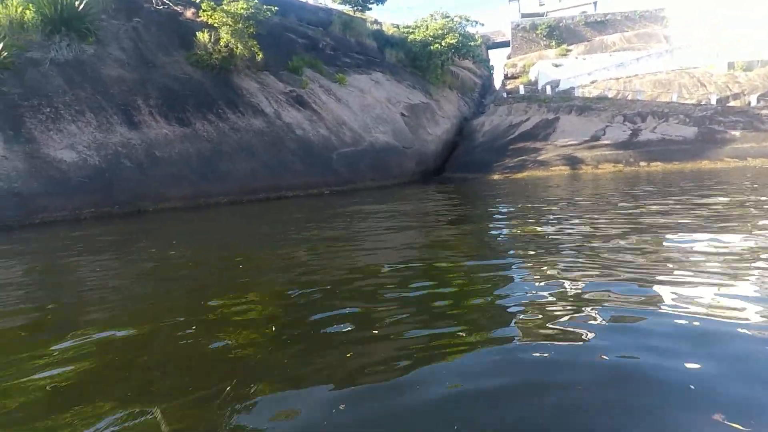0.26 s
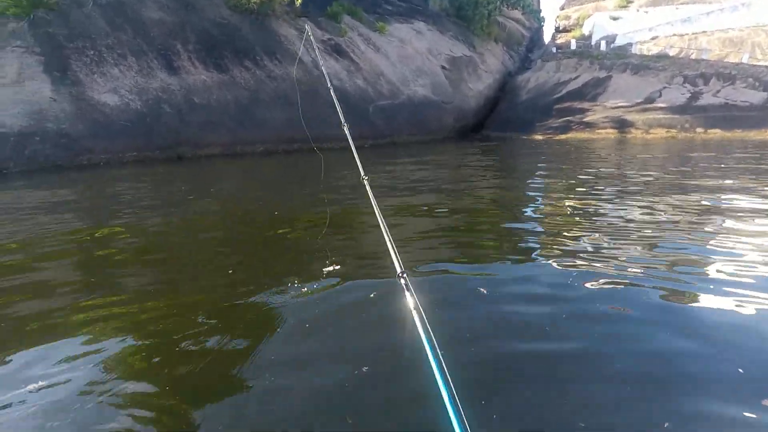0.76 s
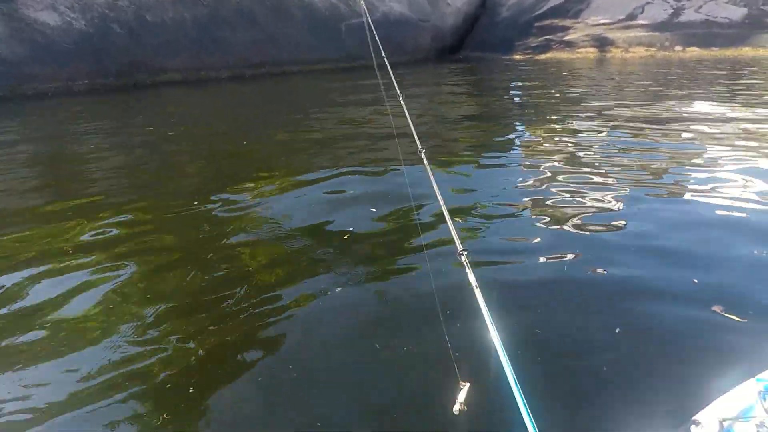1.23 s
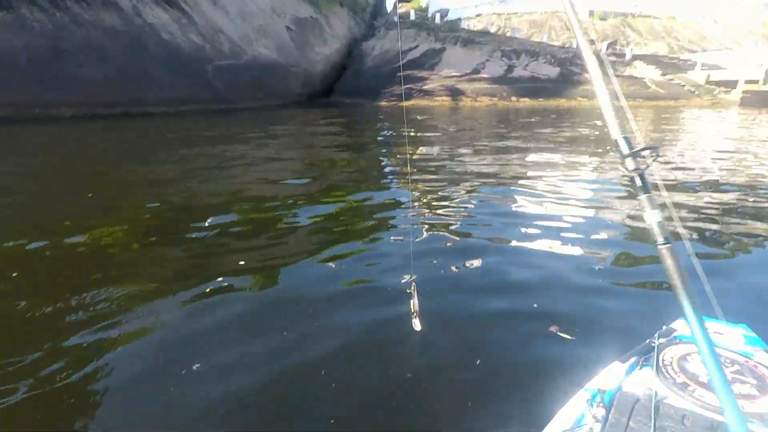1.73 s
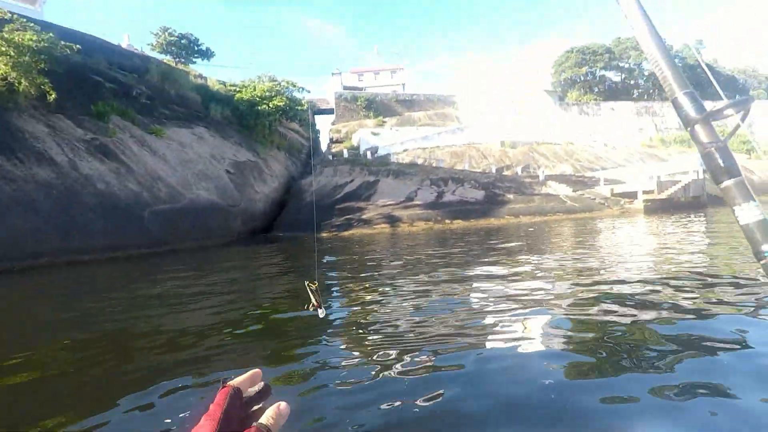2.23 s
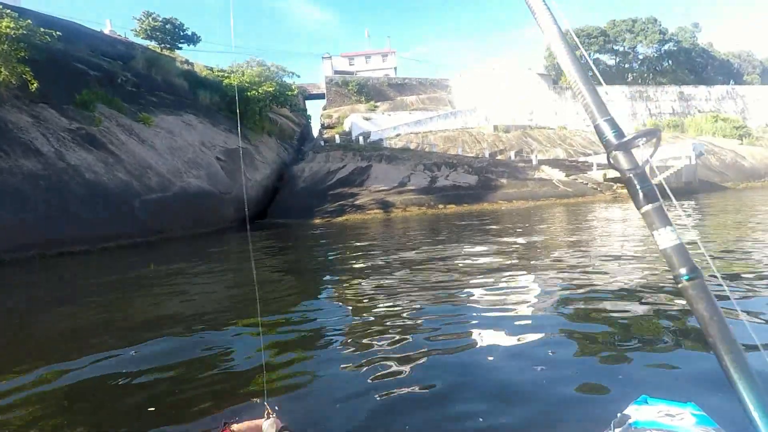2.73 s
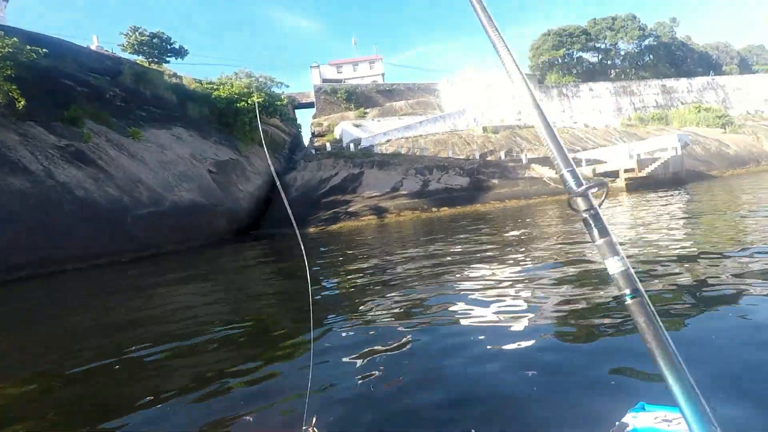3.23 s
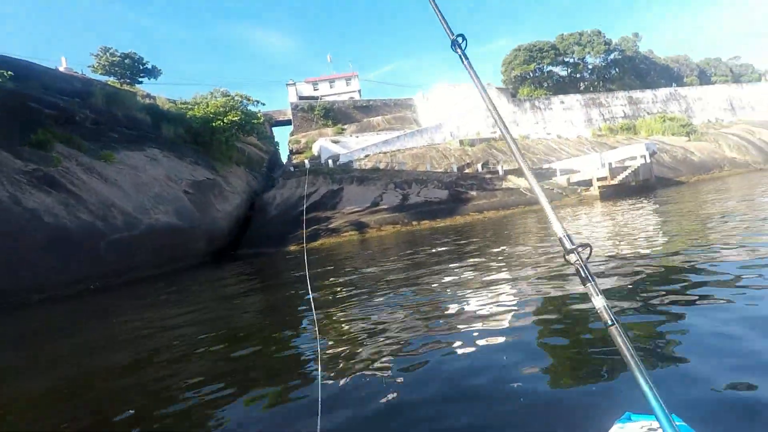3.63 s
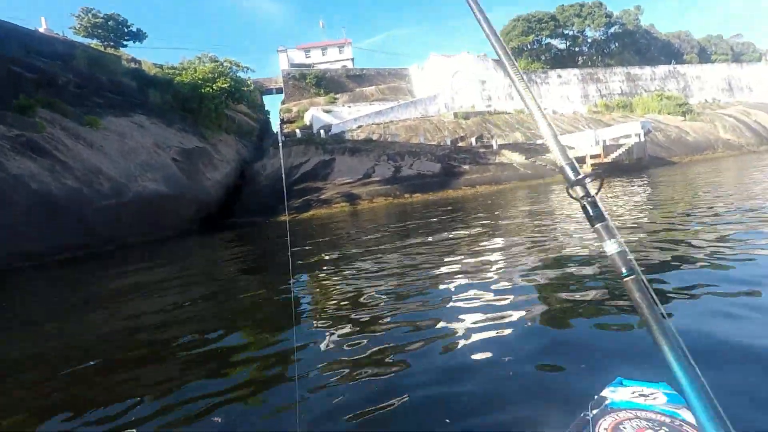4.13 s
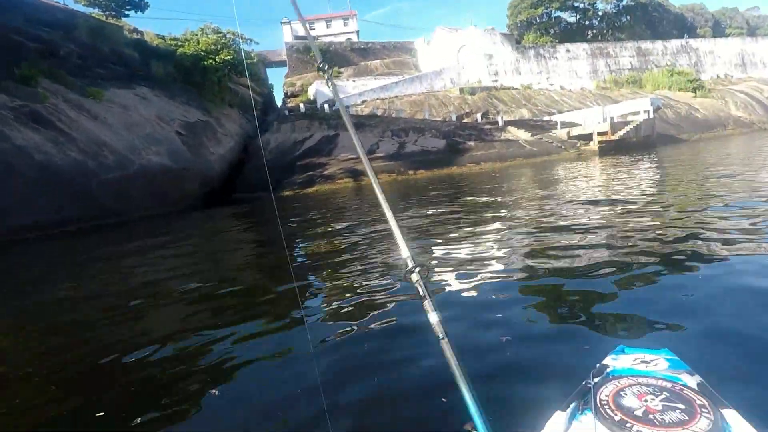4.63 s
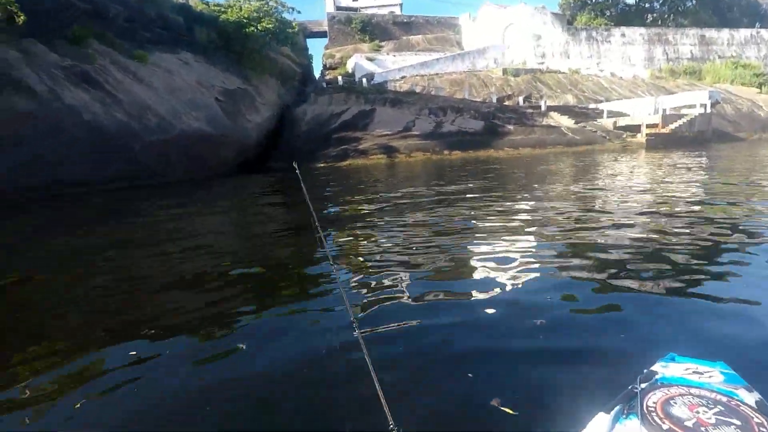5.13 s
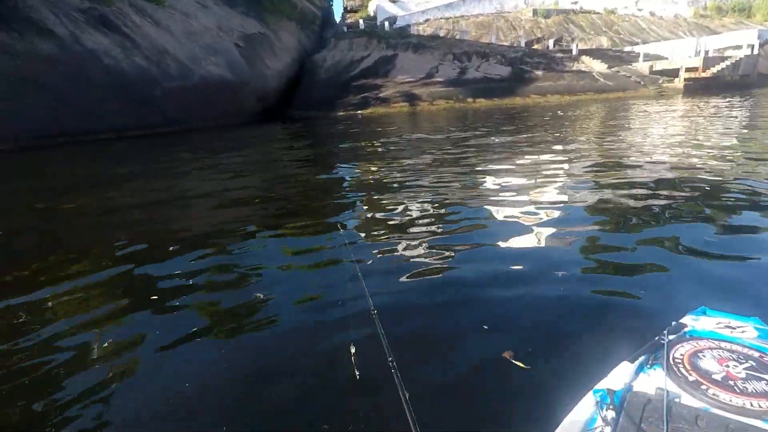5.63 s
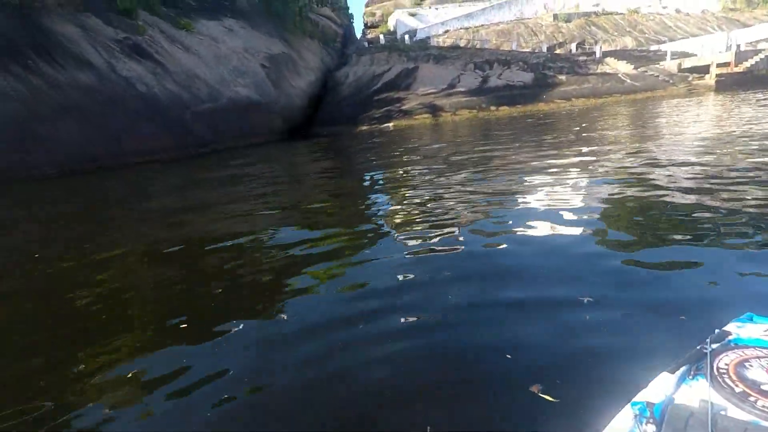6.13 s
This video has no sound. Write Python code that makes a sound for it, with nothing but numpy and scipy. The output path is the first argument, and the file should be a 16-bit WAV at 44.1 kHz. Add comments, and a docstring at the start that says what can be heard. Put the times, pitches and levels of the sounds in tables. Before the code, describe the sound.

A low, beating hum and noisy rumble runs unbroken, boxed in by a closed camera housing, with soft water wash and a very thin pulsing whine on the left. Small ripples plop at 0.4, 1.3 and 1.8 seconds; dry line rustle and ticks sit on the right, with a snag near 1.05. At 2.0 to 2.2 gear scrapes, clacks and drops with a hollow double thud. Around 2.5 the reel clicks rapidly and drags, then a hard knock at 2.67. Line crackles at 3.2 to 3.35, followed by hull bumps at 3.36 and 3.41. The reel snaps sharply at 3.9, and the loudest plastic knock follows at 4.0. A line slide rustles at 4.3, with faint tones at 4.1 and 4.8. From 5.0 drops ping brightly at 5.13, rustling grows, and hollow slaps of water come at 5.0, 5.2, 5.6 and 6.1.

```python
"""Kayak and fishing gear heard through a closed housing

Beating low tones and filtered-noise rumble fill the housing; filtered noise washes along hull and shore.
Ripples slap the plastic and trap ringing air. Gear blows excite mount and hull modes; the reel clicks,
snaps and drags. Line and cloth rustle in noise grains and snag, and drops ping, all mostly on the right.
A thin pulsing whine sits on the left, and two faint tones glide by."""
import sys
import numpy as np
from scipy import signal
from scipy.fft import rfft, irfft, next_fast_len
from scipy.io import wavfile
from scipy.ndimage import uniform_filter1d, minimum_filter1d, map_coordinates

SR = 44100
rng = np.random.default_rng(int(sys.argv[2]) if len(sys.argv) > 2 else 0)


def master_out(mix):
    """Clip the mix to full scale and print it as 16-bit PCM to the path in sys.argv[1]."""
    frames = np.transpose(np.atleast_2d(mix))
    ceiling = np.clip(frames, -1, 1)
    pcm = np.round(ceiling * 32767).astype(np.int16)
    wavfile.write(sys.argv[1], SR, pcm)


N = 280917
T = np.arange(N) / SR  # [s]

# Levels are relative inside each layer; left-right values are positive toward the left.
# low hum tones: (frequency [Hz], level [dB])
HUM_TONES = [(42, -25.5), (48, -20), (72, -37), (78, -25.5), (90, -18.5), (100.9, -33.5), (114.1, -23.5),
             (120, -28.5), (183.9, -49), (216.1, -44), (250.5, -43.5)]
# rumble spectrum shape: (frequency [Hz], density [dB per Hz])
RUMBLE_SPECTRUM = [(8, -51), (16, -9.5), (24, -0.5), (50, 6.5), (75, 4.5), (115, -2), (135, -1),
                   (160, -9.5), (186, -8.5), (235, -17.5), (290, -24.5), (400, -41), (600, -63),
                   (1500, -110)]
# balance of hum and rumble: (frequency [Hz], left-right [dB])
DRONE_LEAN = [(30, 0.1), (70, 1.4), (140, 1.5), (250, 6), (350, 18.5), (700, 39.5)]
# wash spectrum shape: (frequency [Hz], density [dB per Hz])
WASH_SPECTRUM = [(150, -45), (330, 0.5), (480, 1.5), (820, -0.5), (1050, -4.5), (1500, -8.5), (2200, -13.5),
                 (3500, -19), (5000, -23), (9000, -23.5), (11000, -29), (14500, -41)]
# wash along the hull: (time [s], level [dB])
WASH_LEVELS = [(0.0, -47.5), (0.499, -49.5), (1.6, -52.5), (2.02, -48.5), (2.25, -51), (2.9, -50.5),
               (6.37, -48.5)]
# correlation of the wash between ports, before their phase turn: (frequency [Hz], likeness [-1..1])
PORT_LIKENESS = [(300, 0.75), (1000, 0.64), (1600, 0.16), (4000, 0.81), (5500, .1)]
# flexing housing walls drive the ports against each other: (frequency [Hz], left lead [rad])
PORT_PHASE = [(150, 0), (280, 0), (380, 2.45), (1150, 2.65), (1750, 1.4), (2450, 2.1), (3500, .4),
              (4500, .2), (5100, -1.8)]
# rubbing line and cloth spectrum shape: (frequency [Hz], density [dB per Hz])
RUSTLE_SPECTRUM = [(1000, -58.5), (3000, -12.5), (4800, -10), (6000, -2.5), (7700, -0.5), (8700, -10.5),
                   (10000, -14), (12500, -36.5), (14500, -49)]
# tick spectrum: (frequency [Hz], density [dB per Hz])
SNAP_SPECTRUM = [(1000, -38), (3000, -12.5), (4800, -5.5), (7700, 7.5), (9800, -9.5), (12500, -17),
                 (13600, -25.5), (15000, -44)]
# rubbing line and cloth: (time [s], level [dB])
RUB_LEVELS = [(0.0, -56), (1.03, -55.5), (1.24, -57), (1.58, -60), (2.55, -59), (2.68, -55), (3.03, -55),
              (3.21, -53), (3.8, -56.5), (4.36, -57), (4.54, -63), (5.13, -59.5), (5.4, -54), (5.63, -52),
              (5.87, -56), (6.37, -53)]
# line running through the fingers: (start [s], length [s], change of rubbing level [dB])
LINE_SLIDES = [(1.074, 0.059, 6), (3.202, 0.083, 6), (4.323, 0.26, 4), (5.12, 0.088, 10.5),
               (5.205, .07, -4), (5.985, 0.056, 11)]
# line snagging and snapping free: (time [s], level [dB])
LINE_SNAGS = [(0.175, -26.5), (0.9325, -33), (1.0547, -24), (1.103, -28), (2.7526, -32.5), (3.2199, -21.5),
              (3.267, -24.5), (3.2952, -21), (3.3088, -23), (3.3583, -24.5), (4.289, -38), (4.3796, -22.5),
              (4.3857, -28), (5.1312, -33), (5.232, -25), (5.265, -34), (5.957, -23.5)]
# drops from the wet line pinging on the gear: (time [s], level [dB], pitch [Hz])
DROP_PINGS = [(0.177, -31, 7500), (0.932, -31, 7760), (1.006, -33.5, 5990), (2.706, -31, 7500),
              (2.919, -26.5, 7760), (3.219, -34.5, 11900), (4.067, -34, 8050), (4.251, -35, 8000),
              (4.289, -37, 5360), (5.124, -30, 6900), (5.131, -21.5, 7700), (5.215, -34, 8000),
              (5.221, -27, 5900), (5.2225, -29, 7700), (5.2323, -35.5, 4000), (5.264, -31, 7100),
              (5.936, -30.5, 7300), (6.142, -38.5, 3070), (6.152, -42, 12000)]
# larger ripples slapping the hull: (time [s], slap [dB], air pocket [dB], cavity pitch [Hz])
HULL_LAPS = [(0.447, -23, -27, 760), (1.335, -32, -19, 340), (1.782, -23, -26, 755), (4.989, -32, -21, 620),
             (5.212, -19, -21, 680), (5.549, -22, -27, 920), (5.624, -25, -26, 750), (6.123, -17, -21, 740)]
# wetted plastic modes: (frequency [Hz], width [Hz], level [dB])
SLAP_MODES = [(540, 150, -5), (800, 200, 0), (1030, 160, -3), (1700, 500, -19)]
# gear dragging against the reel: (start [s], length [s], level [dB])
REEL_DRAGS = [(2.015, .09, -31.5), (2.492, .045, -27.5), (2.51, .15, -32), (3.708, .035, -29),
              (3.885, .1, -38)]
# reel ratchet clicks: (time [s], level [dB], low-pass corner [Hz])
RATCHET_CLICKS = [(2.0415, -22.5, 3000), (2.068, -23, 3000), (2.507, -9.5, 12000), (2.5296, -19.5, 9000),
                  (2.5501, -19, 9100), (2.577, -18, 4500), (2.606, -22, 3500), (2.625, -24, 3500),
                  (2.637, -26.5, 4000), (3.4139, -15.5, 7000), (3.717, -23.5, 2500), (3.8933, -13.5, 6000),
                  (3.941, -23.5, 3000), (3.953, -26, 3000)]
# bail arm snapping over, one row: (time [s], level [dB], low-pass corner [Hz])
BAIL_SNAP = (3.896, -2, 3600)
# reel body modes: (frequency [Hz], width [Hz], level [dB])
REEL_MODES = [(768, 36, 9), (870, 55, 2), (1170, 80, -3), (2410, 85, 2), (2800, 110, -14), (3260, 110, -12),
              (3850, 70, -12), (4280, 120, -6), (4570, 100, -13), (5030, 140, -4), (5650, 200, -16),
              (6570, 130, -13), (7750, 200, -4), (8470, 110, -1), (12300, 600, -23)]
# balance of clicks and bail snap: (frequency [Hz], left-right [dB])
CLICK_LEAN = [(2400, -1), (4500, -3.5), (7500, -9)]
# gear clacking against the camera mount: (time [s], level [dB], low-pass corner [Hz])
MOUNT_KNOCKS = [(2.0432, -6.5, 1250), (2.0688, -10, 1200), (2.6674, -0.5, 2800), (3.408, -23, 4000),
                (4.0041, 1.5, 3400)]
# camera mount modes: (frequency [Hz], width [Hz], level [dB])
MOUNT_MODES = [(500, 130, -9), (820, 160, 0), (1070, 170, -6), (1420, 230, -12), (1780, 340, -19),
               (2420, 200, -9), (2850, 280, -15), (3300, 250, -19), (4250, 300, -26), (7750, 500, -25)]
# gear dropping on the hull and bouncing: (time [s], level [dB], low-pass corner [Hz])
HULL_THUDS = [(2.1338, -2.5, 720), (2.148, -1.5, 1900), (2.1578, -9, 900), (2.165, -15, 700),
              (2.669, -11, 400), (3.3646, 0, 520), (3.4122, -4, 1250), (3.421, -10, 620), (3.432, -8, 480),
              (3.441, -20, 1100)]
# hollow hull modes: (frequency [Hz], width [Hz], level [dB])
HULL_MODES = [(215, 55, -1), (307, 65, 4.5), (410, 75, 3.5), (505, 65, 8.5), (590, 70, -3), (830, 100, -4),
              (990, 100, -3), (1190, 140, -12), (1680, 260, -15)]
# balance of the thuds: (frequency [Hz], left-right [dB])
THUD_LEAN = [(300, 10), (420, 7), (520, 1), (1500, 0)]
# phase between ports as a thud rocks the housing: (frequency [Hz], left lead [rad])
ROCKING_PHASE = [(150, -.8), (330, -2.3), (600, -2.55), (750, -3.7), (1100, -3.9), (1400, -6)]
# faint gliding tones: (start [s], length [s], from [Hz], to [Hz], level [dB])
TONE_GLIDES = [(4.07, .21, 605, 595, -53), (4.76, .17, 710, 800, -51)]

WASH_SWING_DB = 0.9
SLIP_GAP_S, SLIP_LOSS_DB = 0.0079, 13  # typical gap and loss between slips after a snag
DROP_T60_S, DROP_ATTACK_S = 0.012, 0.00063
DROP_CRACK_DB, DROP_LEAN_DB = -11.5, -14
RIPPLE_DB, RIPPLE_HZ, RIPPLE_LOG_SPREAD = -37, 720, 0.16  # small ripples, centre values and pitch scatter
POCKET_CYCLES = 11.5  # cycles at the cavity pitch for a 60 dB decay
TOP_HZ = 15200


def amp(db):
    """Decibels to gain."""
    return 10 ** (np.asarray(db) / 20)


def unit(x):
    """Scale to rms 1."""
    return x / np.sqrt(np.mean(x ** 2) + 1e-20)


def along(points, hz):
    """Interpolate (frequency [Hz], value) points on a log axis."""
    f, v = np.transpose(points)
    return np.interp(np.log(hz + 1), np.log(f + 1), v)


def wobble(knots_hz):
    """Smooth random curve."""
    knots = rng.standard_normal(int(N * knots_hz / SR) + 4)
    return map_coordinates(knots, [T * knots_hz])


def swell(start_s, length_s):
    """Half-sine rise and fall, zero outside."""
    return np.sin(np.pi * np.clip((T - start_s) / length_s, 0, 1))


def filtered(x, response):
    """Apply a complex response of frequency [Hz]."""
    size = next_fast_len(N + SR // 2)
    return irfft(rfft(x, size) * response(np.fft.rfftfreq(size, 1 / SR)), size)[..., :N]


def coloured(x, spectrum):
    """Shape x by a (frequency [Hz], level [dB]) spectrum."""
    return filtered(x, lambda hz: amp(along(spectrum, hz)))


def softened(x, corner_hz, order):
    """Low-pass: soft contact carries little treble."""
    sos = signal.butter(order, min(corner_hz, SR / 2 - 1), fs=SR, output="sos")
    return signal.sosfilt(sos, x)


def resonate(x, modes, sign=-1):
    """Parallel modes, alternately opposed (-1) or in step (+1); a unit impulse rings with peak 1."""
    def body(hz):
        total = 0
        for k, (centre_hz, width_hz, db) in enumerate(modes):
            damping = 1j * hz * width_hz
            total = total + sign ** k * amp(db) * damping / (centre_hz ** 2 - hz ** 2 + damping)
        return total

    impulse_ring = irfft(body(np.fft.rfftfreq(SR, 1 / SR)))
    return filtered(x, body) / np.abs(impulse_ring).max()


def lean(db):
    """Left and right gains for a left-right level difference."""
    return amp(np.array([[.5], [-.5]]) * db)


def housing(x):
    """Flexing walls turn the phase between the two ports with frequency."""
    halves = np.array([[.5], [-.5]])
    return filtered(x, lambda hz: np.exp(1j * halves * along(PORT_PHASE, hz)))


def contacts(times_s, levels_db, scatter_db, t60_s):
    """Stereo blows: one impulse each, with a dying chatter that differs between ports."""
    out, t = np.zeros((2, N + SR)), T[:SR // 5]
    for s, db in zip(times_s, levels_db):
        chatter = rng.standard_normal((2, len(t))) * amp(-60 * t / t60_s)
        blow = amp(scatter_db) * chatter / np.linalg.norm(chatter[0])
        blow[:, 0] += 1
        out[:, round(s * SR):][:, :len(t)] += amp(db) * blow
    return out[:, :N]


def level_off(x, top_db, hold_s):
    """Smooth limiter: gain eases down round each peak above the ceiling."""
    size = max(int(hold_s * SR), 1)
    gain = np.minimum(1, amp(top_db) / (np.abs(x) + 1e-9))
    gain = minimum_filter1d(gain, size)
    return x * uniform_filter1d(uniform_filter1d(gain, size), size)


def drone():
    """Steady low tones beat over noise rumble, limited together; only the level differs between ports."""
    tones = np.zeros(N)
    for hz, db in HUM_TONES:
        phase = 2 * np.pi * (hz * T + rng.random()) + 0.013 * wobble(2.0)
        tones += amp(db) * np.sqrt(2) * np.sin(phase)
    rumble = amp(-16.5) * unit(coloured(rng.standard_normal(N), RUMBLE_SPECTRUM))
    edge_fade = signal.windows.tukey(N, .004)
    held = edge_fade * level_off(tones + rumble, top_db=-8.0, hold_s=0.014)
    return filtered(held, lambda hz: lean(along(DRONE_LEAN, hz)))


def water():
    """Ripples wash softly along hull and shore: coloured noise, partly alike in the two ports."""
    s, level_db = np.transpose(WASH_LEVELS)

    def mid_side(hz):
        turn = np.arccos(np.clip(along(PORT_LIKENESS, hz), -1, 1)) / 2
        return amp(along(WASH_SPECTRUM, hz)) * [np.cos(turn), np.sin(turn)]

    mid, side = filtered(rng.standard_normal((2, N)), mid_side)
    wash = unit(housing(np.array([mid + side, mid - side])))
    return wash * amp(np.interp(T, s, level_db) + 7.5 + WASH_SWING_DB * wobble(8.3))


def repeats(times_s, levels_db, gap_s, loss_db, count, scatter=0):
    """Follow each contact by ever weaker ones, count in all; scatter makes gaps uneven."""
    gaps = gap_s * np.exp(scatter * rng.standard_normal((len(times_s), count)))
    all_times_s = times_s[:, None] + np.cumsum(gaps, axis=1) - gaps
    all_levels_db = levels_db[:, None] - loss_db * np.arange(count)
    return all_times_s.ravel(), all_levels_db.ravel()


def rustle():
    """Line and cloth slip in noise grains, with stray ticks and louder snaps where the line snags."""
    s, level_db = np.transpose(RUB_LEVELS)
    snag_s, snag_db = np.transpose(LINE_SNAGS)
    times_s, snap_db = repeats(snag_s, snag_db, SLIP_GAP_S, SLIP_LOSS_DB, count=3, scatter=0.27)
    slide_db = sum(db * swell(start_s, length_s) for start_s, length_s, db in LINE_SLIDES)

    grains = rng.standard_normal((2, N)) * amp(2.1 * wobble(350))
    stray = (rng.random(N) < 70 / SR) * rng.standard_normal((2, N))  # about 70 ticks a second
    texture = unit(coloured(grains, RUSTLE_SPECTRUM)) + amp(-7.0) * unit(coloured(stray, SNAP_SPECTRUM))
    rub = texture * amp(np.interp(T, s, level_db) + slide_db - 4.5 + 1.2 * wobble(23))

    # dying shower of smaller slips: chatter thinned at random
    slips = contacts(times_s, snap_db, scatter_db=11, t60_s=.1) * (rng.random(N) < 2000 / SR)
    snaps = contacts(times_s, snap_db, scatter_db=-2, t60_s=.012) + slips
    return rub * lean(-22.0) + amp(11.5) * coloured(snaps, SNAP_SPECTRUM) * lean(-14)


def whine(hz=8960, width_hz=130, rms_db=-63):
    """Thin electronic whine: narrow-band noise pulsing at 60 Hz, mostly on the left."""
    band = unit(filtered(rng.standard_normal(N), lambda f: np.exp(-.5 * ((f - hz) / width_hz) ** 2)))
    pulse = 1 + np.sin(2 * np.pi * 60 * T)
    return amp(rms_db) * unit(band * pulse) * lean(7)


def drops():
    """Drops strike the gear: a tiny noise crack and a decaying ping of given pitch."""
    out, t = np.zeros(N + SR), T[:SR // 20]
    attack = 1 - np.exp(-t / DROP_ATTACK_S)
    for s, db, hz in DROP_PINGS:
        noise = softened(rng.standard_normal(len(t) + 1), 8000, order=4)
        crack = amp(DROP_CRACK_DB) * unit(np.diff(noise))
        ping = np.sin(2 * np.pi * hz * t) + crack
        out[round(s * SR):][:len(t)] += ping * amp(db - 60 * t / DROP_T60_S) * attack
    return out[:N] * lean(DROP_LEAN_DB)


def ripples(count):
    """Small laps at chance moments, as rows like HULL_LAPS."""
    rows = []
    for _ in range(count):
        s = rng.random() * T[-1]
        slap_db, pocket_db = RIPPLE_DB + rng.normal(0, 2, size=2)
        rows.append((s, slap_db, pocket_db, RIPPLE_HZ * np.exp(rng.normal() * RIPPLE_LOG_SPREAD)))
    return rows


def laps():
    """Each ripple slaps the plastic and traps an air pocket that rings briefly, rising in pitch."""
    pockets, t = np.zeros(N + SR), T[:SR // 10]
    waves = list(HULL_LAPS) + ripples(count=8)
    for s, _, db, hz in waves:
        ring = np.sin(2 * np.pi * hz * (t + 1.5 * t * t)) * (1 - np.exp(-t / .001))
        pockets[round(s * SR):][:len(t)] += amp(db + 5.5 - 60 * t * hz / POCKET_CYCLES) * ring
    s, slap_db, _, _ = np.transpose(waves)
    splash = contacts(s, slap_db, scatter_db=-2, t60_s=.05)[0]
    slaps = softened(resonate(splash, SLAP_MODES), 2200, order=3)
    return housing(pockets[:N] + slaps) * lean(-3.0)


def reel():
    """Pawl scrapes and one bail strike ring the reel; dragging gear excites it and the mount."""
    shared, own = rng.standard_normal((2, N))
    scrape = np.array([shared + own / 2, shared - own / 2])
    catches = np.zeros((2, N))
    for s, db, top_hz in RATCHET_CLICKS:
        burst = scrape * amp(db) * swell(s - .002, 0.0092) ** 2
        catches += softened(burst, top_hz, order=1)
    bail_s, bail_db, bail_hz = BAIL_SNAP
    snap = softened(contacts([bail_s], [bail_db], scatter_db=-12, t60_s=.02), bail_hz, order=1)

    # dry scrape fills in between the modes
    scraped = amp(-17.5) * (resonate(catches, REEL_MODES) + amp(8.0) * catches)
    ring = scraped + resonate(snap, REEL_MODES)
    clicks = coloured(ring, [(700, -15.5), (2400, -5.5), (8500, -4.5), (10000, -17), (14000, -34)])

    # the drag also shakes the mount, which roughens it
    reel_shake = unit(resonate(rng.standard_normal(N), REEL_MODES))
    mount_shake = amp(-7) * unit(resonate(rng.standard_normal(N), MOUNT_MODES))
    friction = unit(softened(reel_shake + mount_shake, 1200, order=3))
    drag = friction * sum(amp(db) * swell(start_s, length_s) for start_s, length_s, db in REEL_DRAGS)
    return housing(filtered(clicks, lambda hz: lean(along(CLICK_LEAN, hz))) + drag)


def blows(rows, scatter_db, t60_s, order):
    """Mono blows, each as dull as its contact is soft."""
    return sum(softened(contacts([s], [db], scatter_db, t60_s)[0], top_hz, order)
               for s, db, top_hz in rows)


def knocks():
    """Gear strikes the camera mount: a short, chattering plastic clack."""
    hits = blows(MOUNT_KNOCKS, scatter_db=-5, t60_s=.04, order=2)
    return amp(-0.8) * housing(softened(resonate(hits, MOUNT_MODES), 6500, order=2))


def thuds():
    """Heavy contacts start all hull modes in step, judder briefly and rock the housing."""
    hits = blows(HULL_THUDS, scatter_db=-10, t60_s=.1, order=3)
    thud = softened(resonate(hits, HULL_MODES, sign=1), 1900, order=6)

    def rocking(hz):
        phase = np.array([[0], [1]]) * along(ROCKING_PHASE, hz)
        return np.exp(-1j * phase) * lean(along(THUD_LEAN, hz))

    return amp(5.5) * filtered(thud, rocking)


def glides():
    """Two faint tones swell and fade while pitch glides, with a small random phase wobble."""
    out = np.zeros(N)
    for start_s, length_s, from_hz, to_hz, db in TONE_GLIDES:
        hz = np.interp(T, [start_s, start_s + length_s], [from_hz, to_hz])
        tone = np.sin(2 * np.pi * np.cumsum(hz) / SR + .5 * wobble(43))
        out += amp(db) * np.sqrt(2) * swell(start_s, length_s) * tone
    return out


def scene():
    """Sum of all layers at the two ports."""
    steady = drone() + water() + rustle() + whine()
    return steady + drops() + laps() + reel() + knocks() + thuds() + glides()


def record(dry):
    """Camera gain dips as power above about 350 Hz rises; then full-scale clipping and a band limit."""
    bright = dry - filtered(dry, lambda hz: 1 / (1 + (hz / 350) ** 8))
    pole = np.exp(-1 / (.012 * SR))  # 12 ms lag

    def lagged(x):
        return signal.lfilter([1 - pole], [1, -pole], x)

    power = lagged(lagged(np.mean(bright ** 2, axis=0)))
    gain = (1 + power / amp(-20.5) ** 2) ** -.5
    return filtered(np.clip(dry * gain, -1, 1), lambda hz: hz < TOP_HZ)


dry = scene()
out = record(dry)
master_out(out)
```